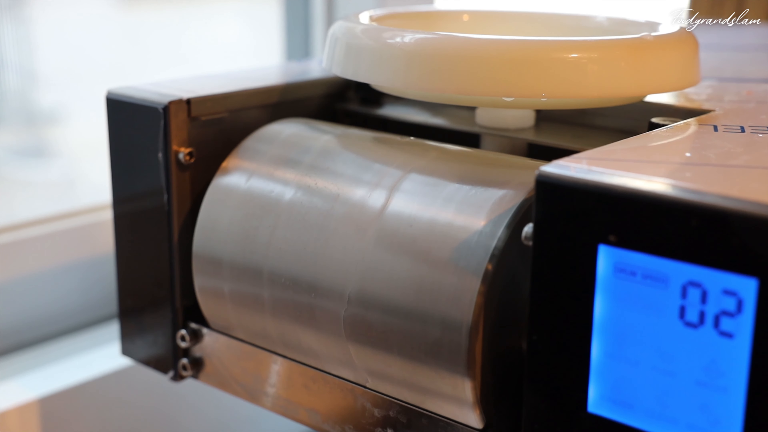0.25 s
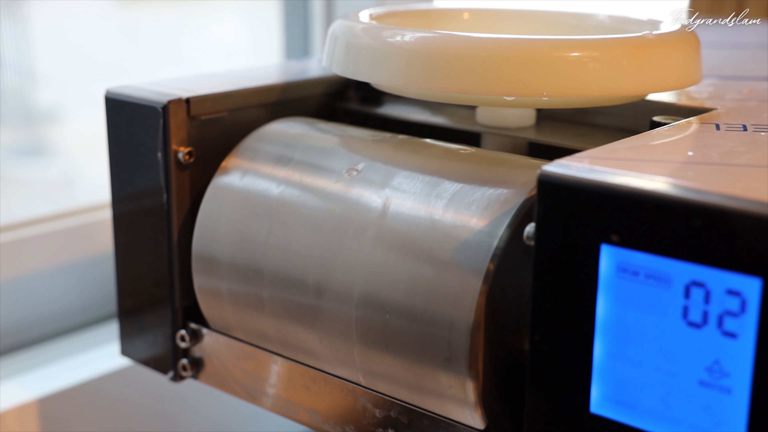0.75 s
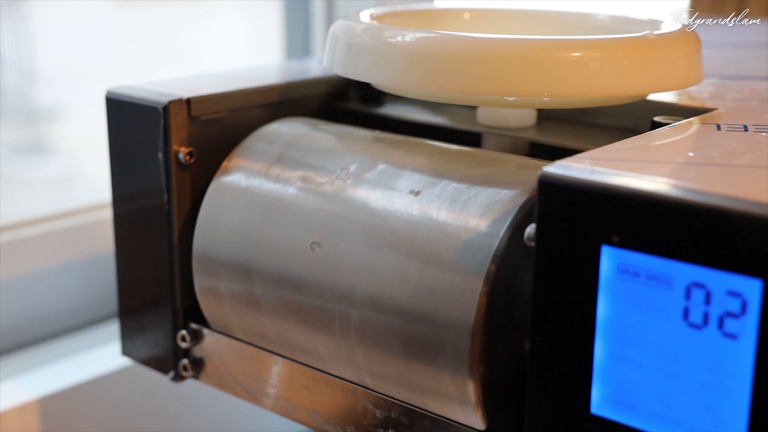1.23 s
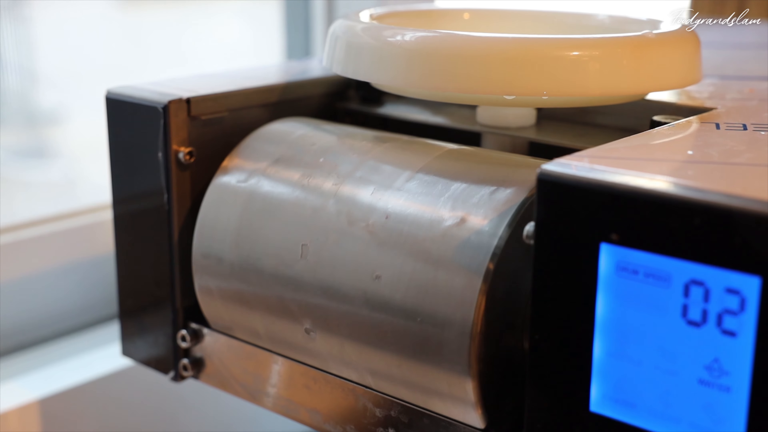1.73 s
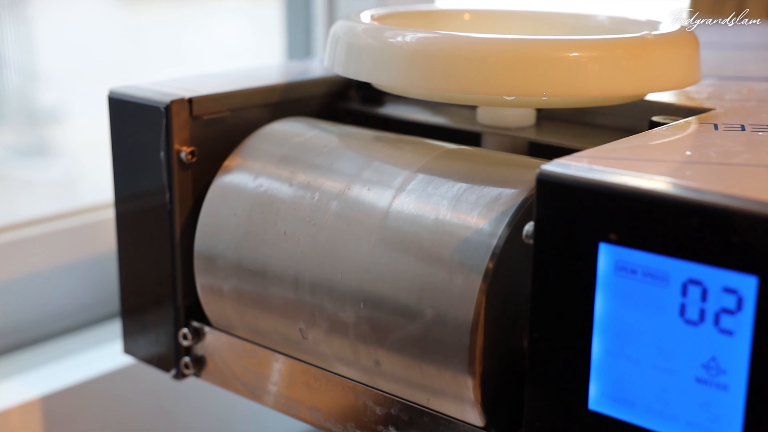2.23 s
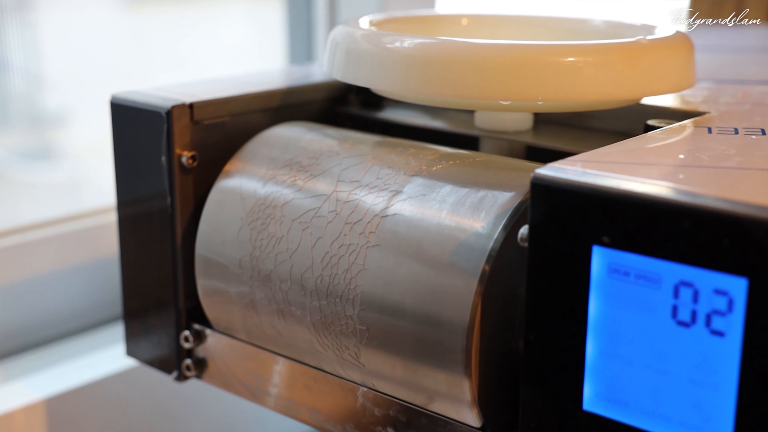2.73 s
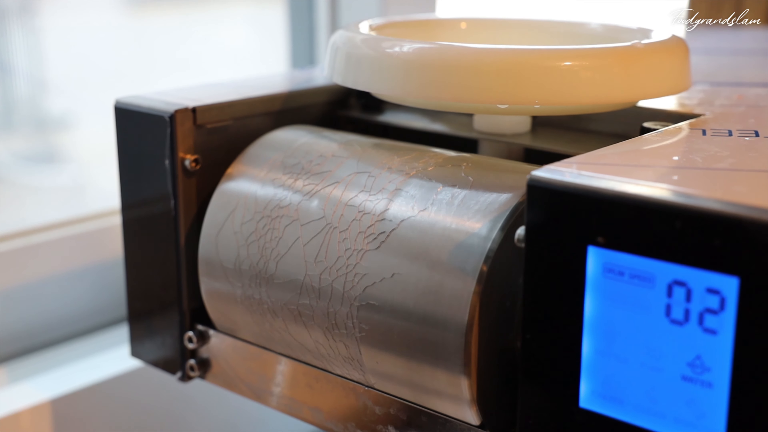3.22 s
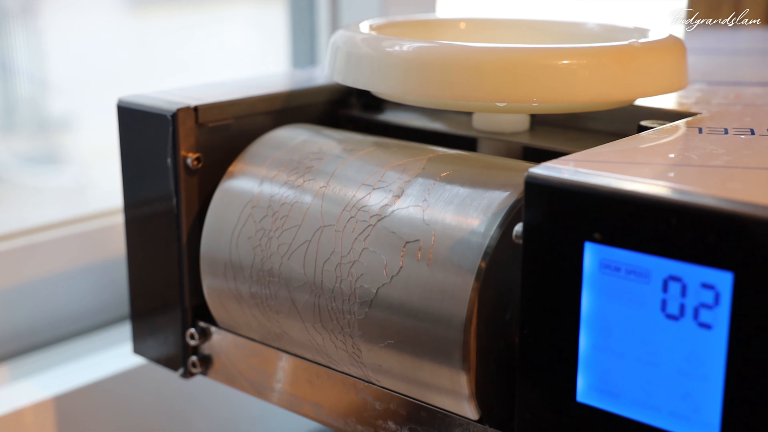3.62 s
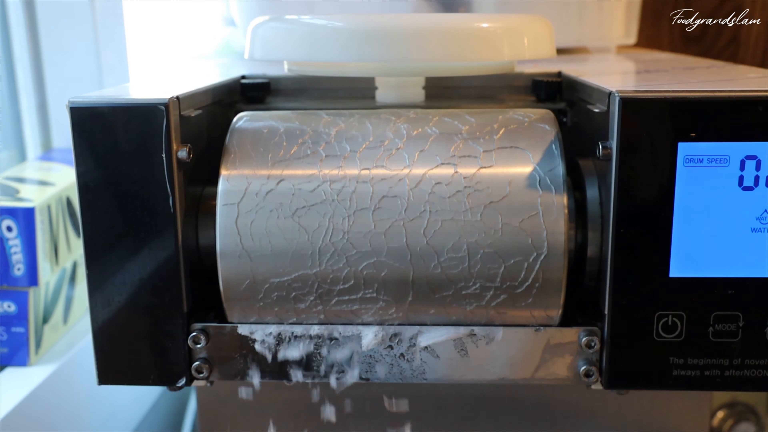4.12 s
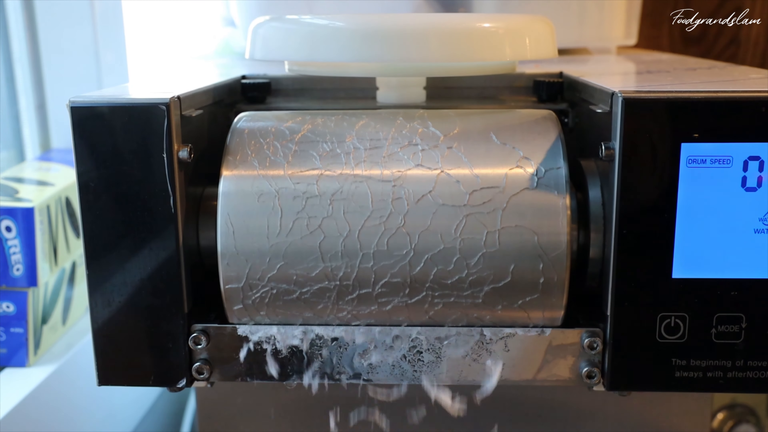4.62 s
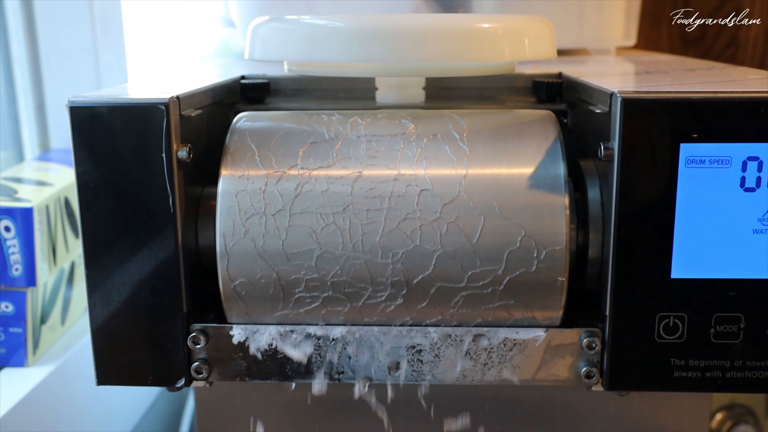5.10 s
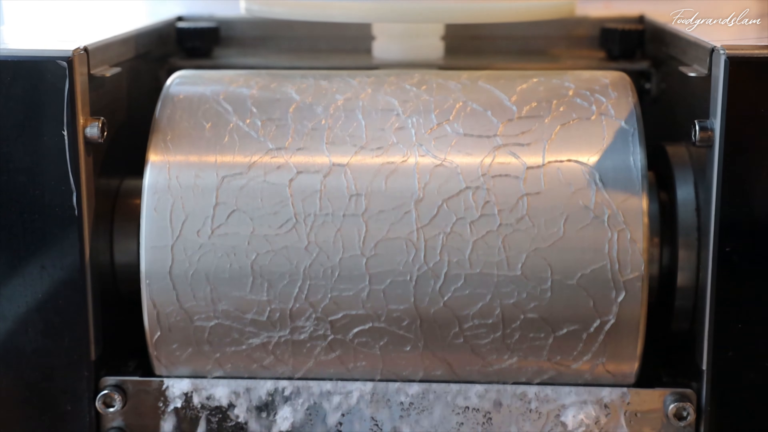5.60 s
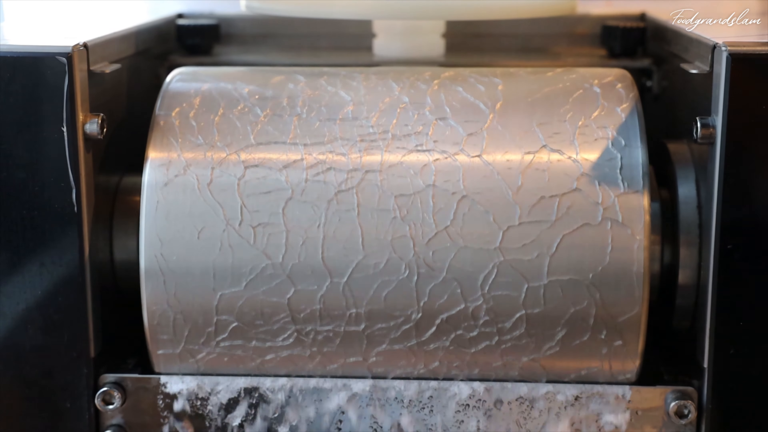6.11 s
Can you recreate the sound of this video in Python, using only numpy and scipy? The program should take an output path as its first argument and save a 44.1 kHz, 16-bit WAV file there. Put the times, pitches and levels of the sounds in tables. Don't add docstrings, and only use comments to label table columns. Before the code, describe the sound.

A close mono view of a motorised ice shaver in a cafe. From 0 s a steady low compressor hum with a loosely buzzing lid and throbbing fan air lies under a continuous gritty scrape of blade on ice, shimmering with metallic resonances. Harder bites near 0.05, 0.8 and 1.1 s bring short fading squeals; brief thinner moments fall around 1.6, 2.2, 2.4 and 3.2 s. Between 1.2 and 2.5 s the high edge chatter grows louder. A metal tray is tapped at 2.8 s and more loudly at 3.74 s, each with a bright short ring. At about 3.93 s the microphone position changes abruptly and the scraping becomes louder and fuller in the mids. A heavy counter thud booms and rattles at 3.98 s. Irregular sharp ice cracks and a few dull lump knocks follow, denser from 5.3 s, strongest near 5.44 s, with scraping and hum continuing until the end around 6.4 s.

```python
import sys
import numpy as np
from scipy import signal
from scipy.fft import rfft, irfft, next_fast_len
from scipy.io import wavfile
from scipy.ndimage import map_coordinates

SR = 44100
rng = np.random.default_rng(int(sys.argv[2]) if len(sys.argv) > 2 else 0)


def master_out(mix):
    frames = np.transpose(np.atleast_2d(mix))
    ceiling = np.clip(frames, -1, 1)
    pcm = np.round(ceiling * 32767).astype(np.int16)
    wavfile.write(sys.argv[1], SR, pcm)


def ratio(d):
    e = np.asarray(d, float) / 20
    return 10 ** e


N = 280035
SLOW = 64
TOP_HZ = 15750


def unit(x):
    return x / np.sqrt(np.mean(x ** 2, axis=-1, keepdims=True) + 1e-20)


def along(points, hz):
    point_hz, point_db = np.transpose(points)
    return ratio(np.interp(np.log(hz + 1), np.log(point_hz + 1), point_db))


def wobble(rate_hz, count):
    knots = rng.standard_normal((count, int(N * rate_hz / SR) + 4))
    where = np.arange(N // SLOW + 1) * SLOW * rate_hz / SR
    return np.array([map_coordinates(k, [where]) for k in knots])


def held(slow):
    return np.repeat(slow, SLOW, axis=-1)[..., :N]


def steps(rows, ease_s, linger=1):
    start, length, db = np.transpose(rows)[:, :, None]
    t = np.arange(N // SLOW + 1) * SLOW / SR
    come = np.tanh((t - start) / ease_s)
    leave = np.tanh((t - start - length) / ease_s / linger)
    return held(np.sum(db * (come - leave) / 2, axis=0))


def filtered(x, response):
    m = next_fast_len(N + 8192)
    return irfft(rfft(x, m) * response(np.fft.rfftfreq(m, 1 / SR)), m)[..., :N]


def band(x, low_hz, high_hz):
    def response(f):
        low_cut = (1 + (low_hz / (f + 1)) ** 16) ** -.5
        return low_cut * (1 + (f / high_hz) ** 16) ** -.5
    return filtered(x, response)


def resonant(colour, modes, modes_db, flicker_db, rate_hz, grit, ripple_db=0):
    grains_db = grit * rng.standard_normal(N // 8 + 1).repeat(8)[:N]
    rub = rng.standard_normal(N) * ratio(grains_db)
    hz, t, spectrum = signal.stft(rub, SR, nperseg=2048, noverlap=1792)
    flare = wobble(rate_hz, count=len(modes)) + .5 * wobble(rate_hz / 6, count=len(modes))
    flare = flare[:, np.minimum(np.arange(len(t)) * 4, flare.shape[1] - 1)]
    centre_hz, width_hz, db = np.transpose(modes)
    peaks = ratio(db + modes_db) / (1 + (2 * (hz[:, None] - centre_hz) / width_hz) ** 2)
    panels = along(colour, np.minimum(hz, TOP_HZ - 500)) * ratio(ripple_db * rng.standard_normal(len(hz)))
    gain = panels[:, None] + peaks @ ratio(flicker_db * flare)
    return signal.istft(spectrum * gain, SR, nperseg=2048, noverlap=1792)[1][:N]


def ring(modes, t):
    return sum(ratio(db + rng.normal(0, 1.7) - 60 * t / t60) * np.sin(2 * np.pi * hz * t)
               for hz, db, t60 in modes)


# start_s, end_s
CHANGE = (3.915, 3.945)


def placed(first, second):
    share = np.interp(np.arange(N) / SR, CHANGE, (0, 1))
    return first * np.sqrt(1 - share) + second * np.sqrt(share)


# shaft_multiple, first_place_db, second_place_db
HUM = [(0.926, -55, -69), (1.97, -51, -50.5), (3.007, -41, -45.5), (4.036, -59.5, -55.5), (5, -60.5, -60.5),
       (5.958, -43, -46.5), (6.99, -44, -41), (8.007, -36.5, -48), (8.94, -53, -59.5), (10.01, -58, -58.5),
       (12.03, -49, -58), (14.05, -61.5, -68), (24.28, -54.5, -58.5), (30.23, -59, -76)]
# start_s, length_s, level_db
LID_RESTS = [
    (.3, .1, -3),
    (.95, 0.098, -10),
    (1.1, 0.39, -3),
    (1.95, 0.15, -3),
    (3.52, .08, -12),
    (3.6, 0.36, -2.5),
]
# pitch_hz, level_db
FAN_AIR = [
    [(15, -53), (25, -23), (173, -7), (290, -12.5), (332, -4.5), (460, -6.5), (565, -8), (694, -7.5), (769, -10), (1500, -9), (1950, -32), (3300, -120)],
    [(15, -56), (25, 2), (60, -28), (173, -10), (285, -14.5), (408, -8), (537, -15), (671, -7), (882, -11), (1500, -15.5), (1950, -45), (3300, -120)],
]
# pitch_hz, width_hz, level_db
CASING = [
    [(654, 23, -1)],
    [(664, 49, 5), (994, 40, 4.5)],
]
TURN_HZ, CHILLER_HZ, CHILLER_DB = 58.29, 186.6, -54.5
LID_DB, FAN_DB = (-2.5, -4.5), (-44, -41.5)


def compressor():
    order, *levels = np.transpose(HUM)[:, :, None]
    order = np.round(order)
    t = np.arange(N) / SR
    turn = 2 * np.pi * TURN_HZ * t
    shake = held(wobble(9, count=len(HUM)))
    shake_db = (0.57 + 0.5 * (order < 5)) * shake
    tones = np.sqrt(2) * ratio(shake_db) * np.sin(order * turn - 2 * np.pi * rng.random(order.shape))
    hum = placed(*[np.sum(ratio(db) * tones, axis=0) for db in levels])

    third = placed(*[ratio(db[2]) for db in levels])
    lid = placed(*[ratio(db[2] + lid_db) for db, lid_db in zip(levels, LID_DB)])
    lid = lid * ratio(steps(LID_RESTS, 0.028))
    hum = hum + (lid - third) * tones[2]

    chiller = np.sqrt(2) * ratio(CHILLER_DB + 1.5 * shake[0]) * np.sin(turn * CHILLER_HZ / TURN_HZ)
    hum = hum + placed(0, chiller)
    hum = hum * ratio(np.interp(t, (3.93, 3.955, 3.98, 4.05), (0, 0.5, -0.5, 0)))

    fan = []
    for colour, modes, db in zip(FAN_AIR, CASING, FAN_DB):
        air = resonant(colour, modes, modes_db=-11, flicker_db=1, rate_hz=12, grit=0, ripple_db=2)
        fan.append(ratio(db) * unit(air))
    throb = 1 - 0.17 * np.sin(turn * 4)
    return hum + throb * placed(*fan)


# pitch_hz, width_hz, level_db
STEEL = [
    [(1426, 10, -23), (1674, 17.6, 7.5), (2135, 52, -11), (2640, 9.4, -3), (2807, 40, -3), (3080, 14, 2), (4150, 82, -8.5), (4780, 63, -7), (5310, 60, -1.5), (5960, 45, -5), (6696, 41, 3), (7050, 55, -14), (7570, 47, -1), (8440, 115, -7.5), (8970, 40, -4), (10100, 48, -15), (11070, 140, -10), (12040, 190, -16), (13250, 220, -13), (14200, 100, -14)],
    [(1610, 150, -5.5), (1922, 107, 5.5), (2178, 28, 10.5), (2476, 78, 1), (2770, 28, -24), (3118, 90, 3), (4480, 48, -3.5), (4910, 230, -9.5), (5130, 47, -10), (5890, 100, -20), (5900, 47, -12), (6920, 56, -1), (7350, 79, 1.5), (7820, 64, -26), (8280, 260, -6.5), (9790, 53, -28), (11600, 320, -18), (12200, 160, -11), (12800, 110, -12), (13600, 120, -16)],
]
# pitch_hz, level_db
ICE = [
    [(530, -34), (900, -21), (1320, -34), (1430, -12), (1900, -3), (2810, -3.5), (3650, -9.5), (5200, -3.5), (5650, -8.5), (6830, -2), (10500, -16.5), (13100, -15), (15300, -10)],
    [(530, -39), (900, -3), (1140, 0.5), (1450, -11.5), (1590, -2), (1900, -4), (2810, -6), (3160, -8), (3780, -10.5), (7250, -6.5), (9870, -13.5), (14100, -9), (15300, -11)],
]
# pitch_hz, width_hz, level_db
EDGE = [
    (12150, 130, 0),
    (12810, 110, 1),
    (13200, 110, -5),
]
# pitch_hz, width_hz, level_db
SQUEAL = [
    (1682, 25, 0.5),
    (2775, 30, 2),
    (3080, 25, -3),
    (4740, 55, -8),
]
# start_s, level_db
PRESSURE = [(0, -0.5), (.1, 2), (.6, 0), (.9, 0.5), (1.3, -1.5), (1.75, -0.5), (2, 0.5), (2.35, -1.5),
            (2.55, 0), (3.7, -0.5), (3.9, 1), (4.13, -1), (4.92, 0), (5.37, 1), (6.35, 1)]
# start_s, length_s, level_db
RIDGES = [
    (0.049, 0.06, 5.5),
    (.29, 0.041, -1),
    (0.726, .04, 2.5),
    (0.808, .08, 5.5),
    (1.04, 0.18, 6),
    (2.472, 0.16, 2.5),
    (3.09, 0.069, 1),
    (3.47, 0.037, -0.5),
    (3.862, .07, 4),
]
# start_s, length_s, level_db
HOLLOWS = [
    (.52, 0.091, -1),
    (.97, 0.087, -2.5),
    (1.24, .06, -1),
    (1.55, 0.05, -3),
    (1.67, .06, -4.5),
    (2.22, .05, -5),
    (2.4, .04, -5.5),
    (3.16, 0.056, -5.5),
    (3.4, .05, -1.5),
]
# drum_db, blade_db, fizz_db
LAYER_DB = [
    (-46.5, -44, -46),
    (-36.5, -38, -43.5),
]
PRESSURE_SHARE = [
    (.5, 1, 1.1),
    (1.1, .9, -0.15),
]
RIDGE_SHARE, HOLLOW_SHARE = (0.26, 0.89, 0.68), (0.16, 0.5, 1.1)
ICING_SHARE, JUDDER_DB = (0, .05, 0.27), (0.75, 0.73, 1.25)
EASE_S, LINGER = 0.01, 1.9
ICING_S, ICING_DB = (1.2, 2.5), 8.5
CHATTER_DB, CHATTER_SHARE = -51, 1.1
SQUEAL_DB, SQUEAL_GROWS, SQUEAL_T60_S = -60.5, 3.2, .9


def blade():
    t = np.arange(N) / SR
    first = resonant(ICE[0], STEEL[0], modes_db=4.0, flicker_db=3.0, rate_hz=10, grit=2.7, ripple_db=4)
    second = resonant(ICE[1], STEEL[1], modes_db=-1.5, flicker_db=1.5, rate_hz=18, grit=2.1, ripple_db=3.5)

    pressure = np.interp(t, *np.transpose(PRESSURE))
    ridges, hollows = steps(RIDGES, EASE_S, LINGER), steps(HOLLOWS, EASE_S)
    icing = placed(np.interp(t, ICING_S, (0, ICING_DB)), 0)
    relief = np.outer(ICING_SHARE, icing) + np.outer(RIDGE_SHARE, ridges) + np.outer(HOLLOW_SHARE, hollows)

    layer_bands = [(1200, 3400), (3400, 9300), (9300, TOP_HZ)]
    parts = []
    for rub, db, share in zip((first, second), LAYER_DB, PRESSURE_SHARE):
        layers = np.array([unit(band(rub, *edges)) for edges in layer_bands])
        parts.append(ratio(np.c_[list(db)] + np.outer(share, pressure) + relief) * layers)
    judder = ratio(np.outer(JUDDER_DB, held(wobble(16, count=1))))
    scrape = np.sum(judder * placed(*parts), axis=0)

    silent = [(10, -120)]
    chatter = unit(resonant(silent, EDGE, modes_db=0, flicker_db=2.5, rate_hz=21, grit=1))
    chatter = chatter * ratio(CHATTER_DB + icing + CHATTER_SHARE * (pressure + hollows))

    squeal = unit(resonant(silent, SQUEAL, modes_db=0, flicker_db=1.5, rate_hz=14, grit=1))
    swell = np.zeros(N)
    for start, _, db in RIDGES:
        onset = np.clip((t - start) / EASE_S + .5, 0, 1)
        swell += ratio(SQUEAL_DB + SQUEAL_GROWS * db - 60 * (t - start) / SQUEAL_T60_S) * onset
    return scrape + placed(chatter + squeal * swell, 0)


# start_s, level_db, crack_db, lower_rim_db, rim_db
TAPS = [
    (2.803, -9.5, 7, 3, 4.5),
    (3.7405, -4.5, 1, -11, -2),
]
# pitch_hz, level_db, t60_s
TRAY = [(2118, -8.5, 0.12), (2825, -10, 0.11), (2930, -11, 0.12), (4235, -17, 0.07), (5300, -7, 0.042),
        (6270, -11, 0.043), (6700, -5, 0.05), (8050, -1, 0.047), (8790, -3, 0.041), (10070, -13, .03),
        (12000, -6.5, 0.047), (12800, 1, 0.024)]
# pitch_hz, level_db, t60_s
RIM = [
    (3089, -5, .12),
    (3231, 0, .18),
]


def tray():
    out, blur = np.zeros(N + SR), np.zeros(N + SR)
    t = np.arange(SR // 3) / SR
    rise = 1 - np.exp(-t / 0.00093)
    for start, db, crack_db, low_db, rim_db in TAPS:
        modes = [(hz, level + low_db * (3000 < hz < 3150) + rim_db * (3000 < hz < 3400), t60)
                 for hz, level, t60 in [*TRAY, *RIM]]
        bright = np.diff(rng.standard_normal(len(t) + 1)) * 0.78
        crack = ratio(crack_db - 60 * t / 0.054) * bright
        here = slice(round(start * SR), round(start * SR) + len(t))
        out[here] += ratio(db - 13.5) * (ring(modes, t) + crack) * rise
        blur[here] += ratio(db - 23.5 - 60 * t / 0.11) * rise
    return out[:N] + blur[:N] * unit(band(rng.standard_normal(N), 1840, 3700))


# start_s, level_db, fizz_db, drum_db
CRACKS = [(3.9294, -24.5, -3, -10), (4.0871, -27, -8, -21), (4.233, -24, -13, 0.5), (4.613, -19, -10, -15),
          (4.8718, -22, -4, -4), (4.9676, -20, -14, -9), (5.2894, -26, -13, -7), (5.2994, -24, -13, -8),
          (5.3754, -33, -13, -8), (5.44, -16.5, -10.5, 0), (5.4634, -22.5, -11, -4.5),
          (5.6146, -22.5, -15, -9), (5.6665, -21, -17, -10), (5.7828, -18, -17, -7.5),
          (5.7994, -18, -19, -8), (5.964, -18, -12, -10), (6.118, -22.5, -11, 0.5), (6.2444, -24, -9, -8)]
# start_s, level_db
KNOCKS = [
    (3.9294, -25),
    (4.0871, -29),
    (5.2894, -31),
    (5.2994, -22),
]
CRACK_T60_S, KNOCK_DB = 0.043, -31
SNAP_DB, SNAP_T60_S, SNAP_GROWS = 12, 0.012, 4.5


def cracks():
    t = np.arange(SR // 8) / SR
    shape = ratio(-8.0 - 60 * t / CRACK_T60_S) * (1 - np.exp(-t / 0.0023))
    loudest_db = np.max(CRACKS, axis=0)[1]
    bursts = np.zeros((4, N + SR))
    for start, db, fizz_db, drum_db in CRACKS:
        levels = ratio(np.c_[[db, db + fizz_db + 9.0, db + drum_db + 3.0, KNOCK_DB]])
        snap = 1 + ratio(SNAP_DB + SNAP_GROWS * (db - loudest_db) - 60 * t / SNAP_T60_S)
        bursts[:, round(start * SR):round(start * SR) + len(t)] += levels * shape * snap
    for start, db in KNOCKS:
        bursts[-1, round(start * SR):][:len(t)] += ratio(db) * shape
    bands = [(4000, 9500), (9500, TOP_HZ), (1500, 4000), (800, 1300)]
    return sum(b * unit(band(rng.standard_normal(N), *edges)) for b, edges in zip(bursts[:, :N], bands))


# start_s, level_db
THUD = (3.985, -16)
# pitch_hz, level_db, t60_s
COUNTER = [
    (42, -11, .6),
    (70, -13, .25),
    (97, -5, .17),
    (108, -10, .45),
    (190, -17, .2),
]
# pitch_hz, level_db
CLATTER = [(88, -26), (150, -3.5), (548, -11), (640, -1.5), (820, -7), (1200, -2), (2130, -14.5),
           (2820, -32), (3090, -23), (3550, -28), (6000, -26), (13200, -120)]


def thud():
    t = np.maximum(np.arange(N) / SR - THUD[0], 0)
    boom = -ring(COUNTER, t) * (1 - np.exp(-t / 0.0027))
    rumble = 0.26 * ratio(-60 * t / 0.72) * unit(band(rng.standard_normal(N), 30, 135))
    rattle = unit(filtered(rng.standard_normal(N), lambda f: along(CLATTER, f)))
    rattle = rattle * (ratio(-4.0 - 60 * t / 0.15) + ratio(-12.0 - 60 * t / 0.79))
    return ratio(THUD[1]) * (boom + rumble + rattle) * (1 - np.exp(-t / 0.0011))


def scene():
    mono = compressor() + blade() + tray() + cracks() + thud()
    return np.array([mono, mono])


def low_pass(x):
    return signal.sosfilt(signal.butter(12, 16660, fs=SR, output="sos"), x)


def record(dry):
    mix = filtered(dry, lambda f: np.clip((TOP_HZ - f) / 100 + .5, .003, 1))
    return low_pass(mix)


dry = scene()
out = record(dry)
master_out(out)
```